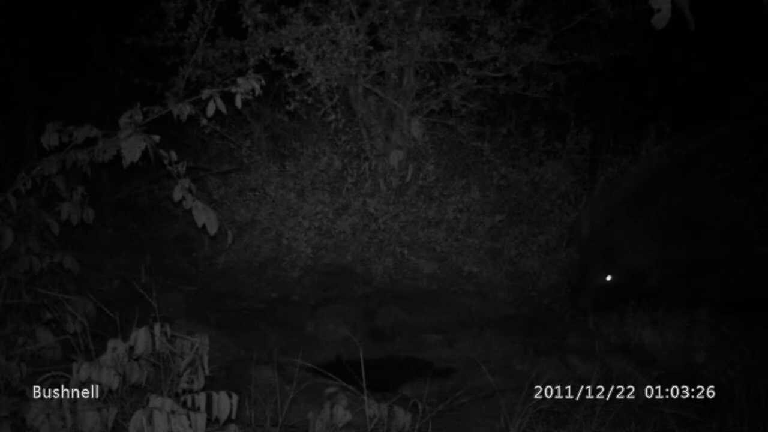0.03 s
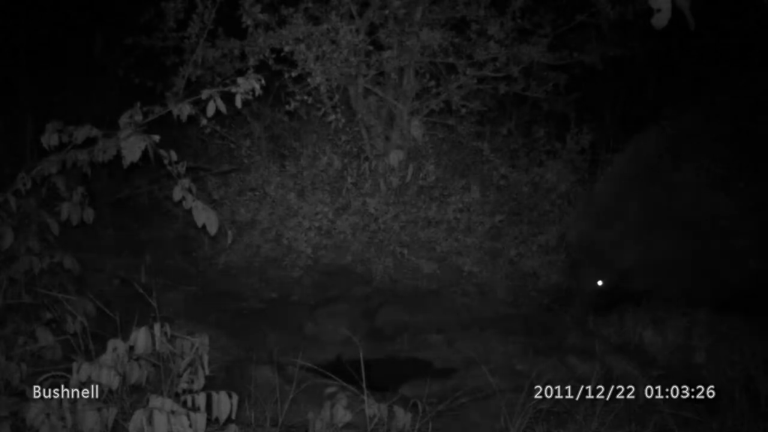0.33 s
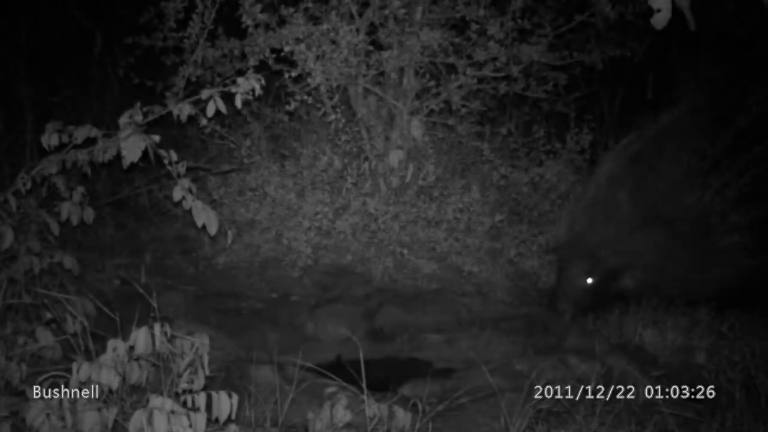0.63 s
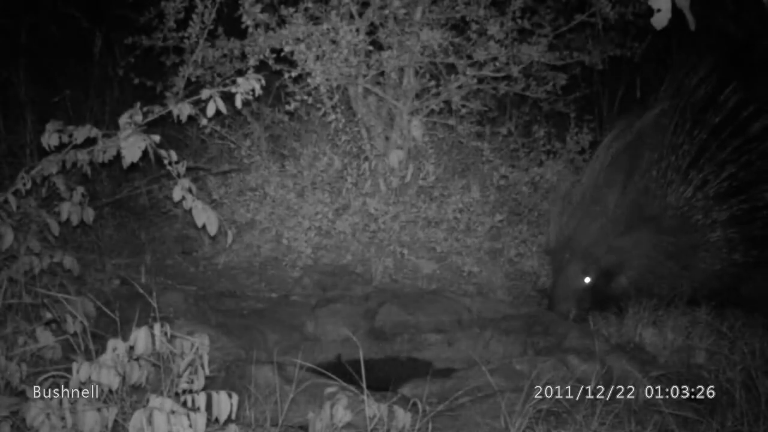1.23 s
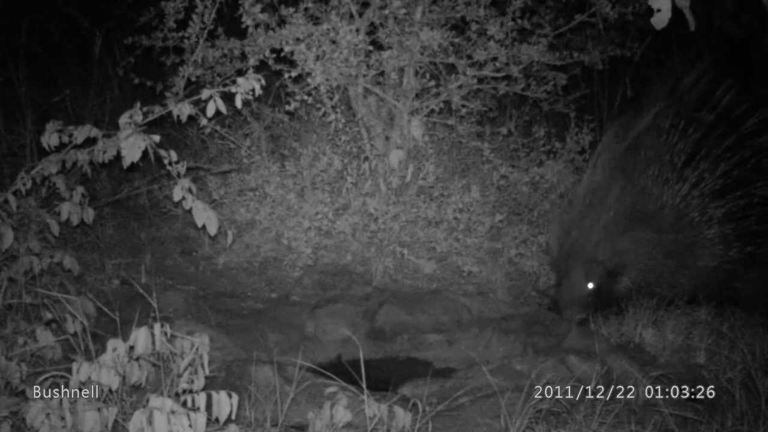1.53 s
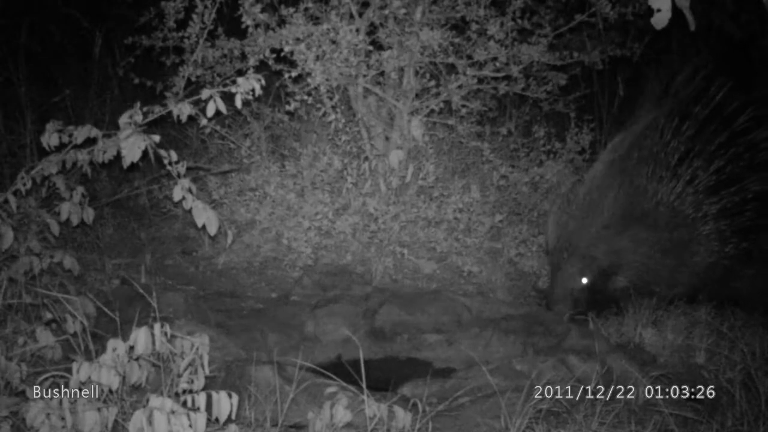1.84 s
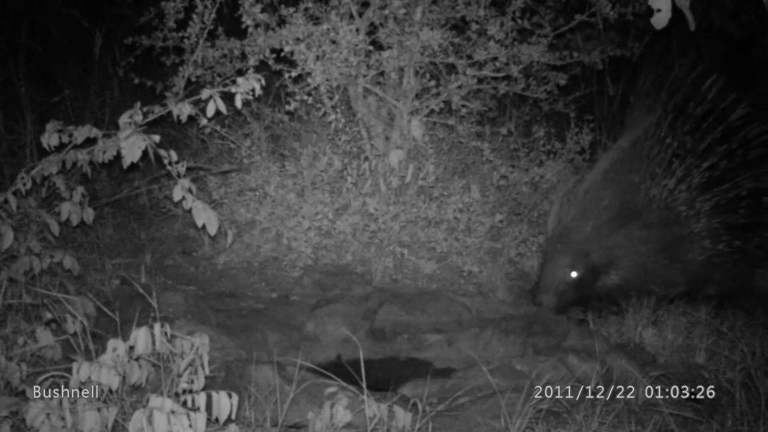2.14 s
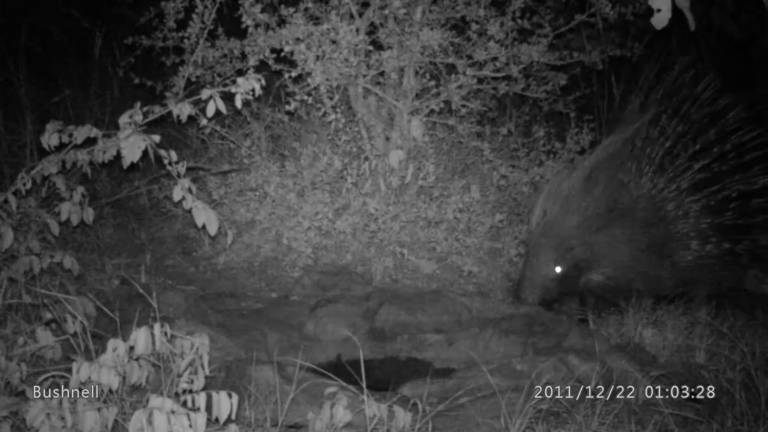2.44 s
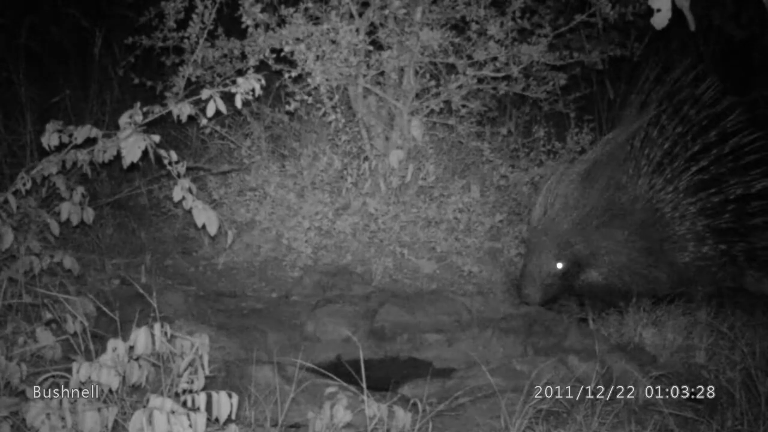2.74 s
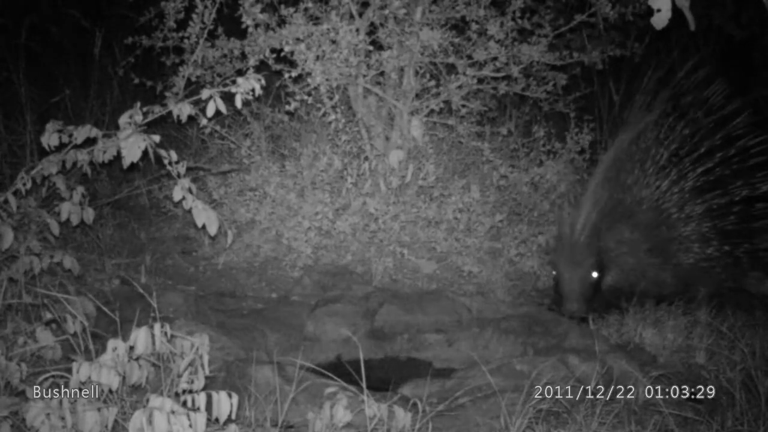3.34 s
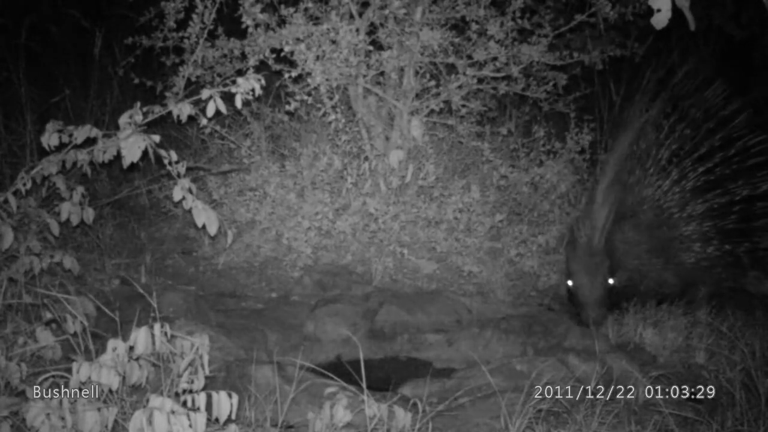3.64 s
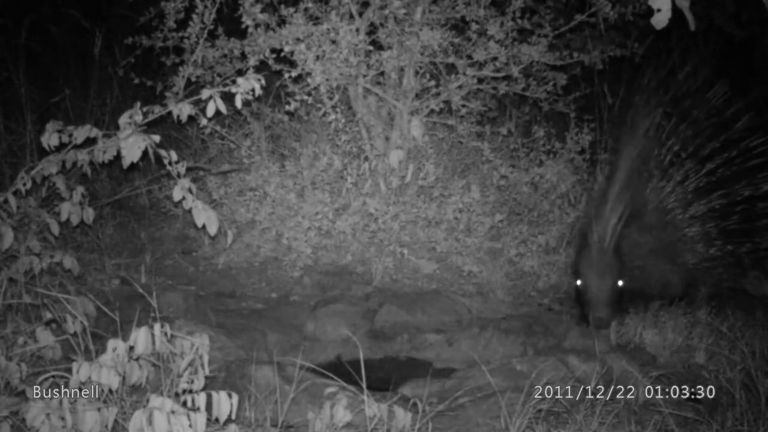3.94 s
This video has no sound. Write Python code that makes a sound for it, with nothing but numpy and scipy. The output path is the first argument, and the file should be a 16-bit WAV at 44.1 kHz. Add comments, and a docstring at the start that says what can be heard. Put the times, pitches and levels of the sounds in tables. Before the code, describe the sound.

Insects trill in short bursts at night over a camera's electrical buzz and hiss.

```python
"""Swelling insect trills at a waterhole at night, heard through a trail camera.
Right: the trills, runs of falling chirps scattered by bushes, over far crickets, twigs and mic hiss.
Left: the camera's electrical noise, a switch-on click, a rasp at each frame, longer bursts and a
warbling whine, over hum, dull bumps and scuffs. The low sample rate mirrors the sound into the treble."""
import sys
import numpy as np
from scipy import signal
from scipy.fft import rfft, irfft
from scipy.io import wavfile
from scipy.ndimage import uniform_filter1d

SR = 44100
rng = np.random.default_rng(int(sys.argv[2]) if len(sys.argv) > 2 else 0)


def persist_wave(psi):
    """Save psi, clipped to +-1, as 16-bit WAV."""
    counts = np.round(np.clip(psi, -1, 1) * 32767).astype(np.int16)
    wavfile.write(sys.argv[1], SR, np.atleast_2d(counts).T)


N = 176400

CHIRP_S, CHIRP_PERIOD_S, CHIRP_GROWTH_S, FIRST_CHIRP_SHARE = .0135, .0186, .145, .6
CHIRP_TAPER, CHIRP_ROUGHNESS, CHIRP_SCATTER_HZ = .65, .2, 30
PITCH_STEP_AGE_S, PITCH_STEP_S = .128, .024
# Trills: first_chirp_s, last_chirp_s, first_db, last_db, swell_s, first_hz, stepped_hz, full_sweep_hz,
# last_length_share
TRILLS = [(1.067, 1.2908, -64.5, -52.5, .145, 4496, 4673, 1090, .9),
          (1.311, 1.454, -63, -66, .14, 4890, 4950, 850, 1),
          (1.8354, 2.0444, -58, -45, .2, 4290, 4588, 890, .6),
          (2.964, 3.129, -69, -65.5, .17, 4940, 4920, 850, 1),
          (3.885, 3.9985, -59, -52, 0.087, 4295, 4600, 880, 1)]
def insect_trills(t):
    """Runs of falling chirps that grow longer and sweep wider; most swell and step up in pitch."""
    out = np.zeros(N)
    for first_s, last_s, first_db, last_db, swell_s, first_hz, stepped_hz, sweep_hz, last_share in TRILLS:
        count = int(round((last_s - first_s) / CHIRP_PERIOD_S)) + 1
        for k, age_s in enumerate(np.linspace(0, last_s - first_s, count)):
            size = FIRST_CHIRP_SHARE + (1 - FIRST_CHIRP_SHARE) * min(age_s / CHIRP_GROWTH_S, 1) ** 2
            length_s = CHIRP_S * size * (last_share if k == count - 1 else 1)
            on = around(first_s + age_s, length_s / 2)
            along = (t[on] - first_s - age_s) / length_s  # -0.5 to 0.5
            step = (1 + np.tanh((age_s - PITCH_STEP_AGE_S) / PITCH_STEP_S)) / 2
            centre_hz = first_hz + (stepped_hz - first_hz) * step + rng.normal(0, CHIRP_SCATTER_HZ)
            pitch_hz = centre_hz - sweep_hz * size ** 2 * along
            level_db = first_db + (last_db - first_db) * min(age_s / swell_s, 1)
            envelope = np.abs(np.cos(np.pi * along)) ** CHIRP_TAPER
            out[on] += envelope * tone(pitch_hz, [level_db])
    roughness = CHIRP_ROUGHNESS * (walk(700) + 1j * walk(650)) / np.sqrt(2)  # amplitude and phase
    return np.real(signal.hilbert(out) * (1 + roughness))


def bush_scatter(x, t, t60_s=.23, tail_db=-8):
    """Bushes scatter a sound into a short diffuse tail."""
    tail = rng.standard_normal(N) * np.exp(-np.log(1000) * t / t60_s)
    return x + amp(tail_db) * signal.fftconvolve(x, tail / np.linalg.norm(tail))[:N]


FRAME_HZ, FIRST_FRAME_S, RASP_S, SQUEAL_WOBBLE = 29.97, .379, .0068, .07
TICK_S, TICK_LEAD_S = .0011, .003
# Busy spell of the electronics: start_s, end_s
BUSY_S = (.680, 1.552)
# Long rasps: start_s, end_s
BURSTS = [(1.878, 2.085), (2.277, 2.318), (2.485, 2.518), (2.583, 2.602), (2.795, 2.818), (2.877, 2.897),
          (3.095, 3.118), (3.177, 3.202), (3.292, 3.318), (3.390, 3.410), (3.480, 3.494), (3.578, 3.603),
          (3.777, 3.800), (3.877, 3.902)]
# Rasp noise: freq_hz, density_db_per_hz
RASP_SPECTRUM = [(100, -116), (550, -114), (900, -105), (1400, -100), (1800, -103), (2300, -103),
                 (2850, -95.5), (3400, -101), (4200, -99), (5100, -95), (5800, -93)]
# Rasp squeal, harmonics 1-2: level_db
RASP_SQUEAL_DB = [-69, -65.5]
def frame_rasp(t, squeal_hz=1433, rasp_gain_db=-2, burst_gain_db=-3, rough_db=2.5):
    """Interference at each frame: ticks, then rasps and longer bursts; muted in the busy spell."""
    def from_frame_s(time_s):
        return np.abs(((time_s - FIRST_FRAME_S) * FRAME_HZ + .5) % 1 - .5) / FRAME_HZ

    running = t > FIRST_FRAME_S - .5 / FRAME_HZ
    ticks = gate(from_frame_s(t + TICK_LEAD_S), -1, TICK_S / 2)
    rasps = amp(rasp_gain_db) * gate(from_frame_s(t), -1, RASP_S / 2)
    bursts = sum(gate(t, *span) for span in BURSTS) * amp(burst_gain_db + rough_db * walk(500))
    envelope = np.maximum(np.where(running, rasps, ticks), bursts) * (1 - gate(t, *BUSY_S))
    squeal = tone(squeal_hz * (1 + SQUEAL_WOBBLE * walk(400)), RASP_SQUEAL_DB)
    return (hiss(RASP_SPECTRUM) + squeal) * envelope


WHINE_DRIFT, WHINE_SCATTER, WHINE_JITTER, WHINE_LIFT, WHINE_RISE = .025, .011, .016, .09, .22  # of pitch
RISE_AT_S, RISE_SCATTER_S, LIFT_EVERY_FRAMES, FIRST_LIFT_FRAME = .0268, .001, 8, 14
# Held note, harmonics 1-4: level_db
WHINE_DB = [-66.8, -66, -70.3, -80]
# Opening squeal, harmonics 1-2: level_db
BUSY_SQUEAL_DB = [-68.5, -66.5]
def busy_whine(t, whine_hz=906, squeal_hz=1362):
    """Busy electronics step through three notes a frame: a squeal, a held note, a short higher one."""
    frame, phase = np.divmod((t - FIRST_FRAME_S + RASP_S / 2) * FRAME_HZ, 1)
    index = (frame - frame[0]).astype(int)
    detune, lateness = rng.standard_normal((index[-1] + 1, 2))[index].T
    age_s = phase / FRAME_HZ
    lift = WHINE_LIFT * ((frame - FIRST_LIFT_FRAME) % LIFT_EVERY_FRAMES == 0)
    rise = WHINE_RISE * gate(age_s, RISE_AT_S + RISE_SCATTER_S * lateness, 1)
    bend = np.maximum(lift + WHINE_DRIFT * phase, rise)
    held = tone(whine_hz * (1 + bend + WHINE_SCATTER * detune + WHINE_JITTER * walk(300)), WHINE_DB)
    squeal = tone(squeal_hz * (1 + SQUEAL_WOBBLE * walk(400)), BUSY_SQUEAL_DB)
    squealing = gate(age_s, 0, RASP_S)
    return (held * (1 - squealing) + squeal * squealing) * gate(t, *BUSY_S)


# Busy hiss: freq_hz, density_db_per_hz
BUSY_SPECTRUM = [(100, -108), (500, -106), (1100, -102), (1600, -102), (2300, -100.5), (3600, -101.5),
                 (5000, -94.5), (5800, -92)]
def busy_hiss(t):
    """Steady electrical noise through the busy spell."""
    return hiss(BUSY_SPECTRUM) * gate(t, *BUSY_S)


# Sizzle: freq_hz, density_db_per_hz
SIZZLE_SPECTRUM = [(8000, -140), (9500, -111), (11000, -117), (12000, -126), (13000, -119), (14000, -114),
                   (15000, -116), (15600, -140)]
def busy_sizzle(t, flicker_db=4):
    """Flickering top treble in both channels through the busy spell."""
    channels = [hiss(SIZZLE_SPECTRUM) * amp(flicker_db * walk(59.96)) for _ in range(2)]
    return np.array(channels) * gate(t, *BUSY_S)


# Scuffs: centre_s, half_width_s, gain_db
SCUFFS = [(0.192, 0.03, 1), (0.269, 0.017, -1), (.491, 0.026, 0), (0.824, 0.034, -4), (1.045, 0.011, 0),
          (1.48, 0.032, -2.5), (1.815, 0.019, -0.5), (2.169, .025, 1.5), (2.237, 0.016, 4),
          (2.399, 0.027, -1.5), (2.472, .02, 3), (2.561, .025, -3), (2.778, .03, 0), (3.304, .018, 3)]
# Scuff noise: freq_hz, density_db_per_hz
SCUFF_SPECTRUM = [(20, -96), (55, -85), (120, -91.5), (200, -92), (320, -100), (500, -107), (900, -130)]
def scuffs(t):
    """Brief swells of dull noise."""
    return hiss(SCUFF_SPECTRUM) * swells(t, SCUFFS)


# Bumps: centre_s, level_db, pitch_hz
BUMPS = [(0.719, -62, 135), (0.904, -62.5, 122), (1.30, -62, 122), (1.412, -60, 122), (1.462, -62.5, 125)]
def bumps(t, half_width_s=.01):
    """Soft low bumps, a few cycles each."""
    out = np.zeros(N)
    for centre_s, level_db, pitch_hz in BUMPS:
        on = around(centre_s, np.pi * half_width_s)
        wave = np.sqrt(2) * np.sin(2 * np.pi * (pitch_hz * t[on] + rng.random()))
        out[on] += wave * swells(t[on], [(centre_s, half_width_s, level_db)])
    return out


def flutter(t, centre_s=1.18, half_width_s=.12, level_db=-63.5):
    """One deep swell of narrow-band noise."""
    return band(61.6, width_hz=29) * swells(t, [(centre_s, half_width_s, level_db)])


# Twigs and dry leaves: centre_s, half_width_s, level_db
TWIGS = [(0.469, 0.0022, -55), (0.608, 0.025, -66), (2.161, 0.096, -70.5)]
def twigs(t):
    """A small snap and rustles on the ground."""
    return band(3970, width_hz=650) * swells(t, TWIGS)


# Single cricket: time_s, level_db
CRICKET_LEVELS = [(.15, -70), (.21, -84), (.6, -78), (1.5, -81.5), (3.1, -78), (3.75, -79.5), (3.86, -77),
                  (3.95, -72.5)]
def far_cricket(t, pitch_hz=3113, waver_hz=17.86, flicker_db=3.5):
    """One far cricket holds a thin, wavering note."""
    note = tone(pitch_hz + waver_hz * walk(70), [0])
    return note * amp(np.interp(t, *np.array(CRICKET_LEVELS).T) + flicker_db * walk(30))


# Chorus: time_s, level_db
CHORUS_LEVELS = [(.1, -78), (1.0, -76), (1.55, -76), (1.8, -79), (2.4, -83), (2.7, -78), (3.25, -76),
                 (3.5, -70), (3.9, -78)]
def cricket_chorus(t, flicker_db=1):
    """Far crickets merge into a narrow band that swells and ebbs."""
    chorus = band(4800, width_hz=120)
    return chorus * amp(np.interp(t, *np.array(CHORUS_LEVELS).T) + flicker_db * walk(22))


# Faint hiss: freq_hz, density_db_per_hz
FLOOR_SPECTRUM = [(30, -112), (400, -115), (800, -111), (2000, -112), (4500, -112), (5800, -113)]
# Rumble: freq_hz, density_db_per_hz
RUMBLE_SPECTRUM = [(20, -94.5), (60, -92.5), (100, -102), (160, -112), (350, -120), (700, -135)]
def background_floor(t, whistle_hz=5184.5, whistle_db=-75.5, hum_hz=86.2, hum_db=-72.5):
    """Faint hiss, an interrupted whistle, a steady low hum and rumble."""
    running = t > FIRST_FRAME_S - 1 / FRAME_HZ
    whistling = running * np.clip(1.2 + 1.9 * walk(40), 0, 1)
    whistle = tone(np.full(N, whistle_hz), [whistle_db]) * whistling
    floor = hiss(FLOOR_SPECTRUM) * amp(np.where(running, 0, -2) + walk(62))
    hum = tone(np.full(N, hum_hz), [hum_db])
    rumble = hiss(RUMBLE_SPECTRUM) * amp(2 * walk(18))
    return floor + whistle + hum + rumble


# Microphone hiss: freq_hz, density_db_per_hz
MIC_SPECTRUM = [(30, -102), (150, -101), (500, -103), (1200, -105), (2200, -106), (3200, -105),
                (4800, -103.5), (5250, -108), (5800, -118)]
def mic_hiss():
    """Steady floor of the microphone channel."""
    return hiss(MIC_SPECTRUM)


def amp(db):
    """Decibels to gain."""
    return 10 ** (np.asarray(db) / 20)


def colour(x, points):
    """Filter by (freq_hz, gain_db) points."""
    hz, db = np.array(points, float).T
    bins_hz = np.maximum(np.fft.rfftfreq(2 * N, 1 / SR), 1)
    gain = amp(np.interp(np.log(bins_hz), np.log(hz), db))
    return irfft(rfft(x, 2 * N) * gain)[:N]


def hiss(spectrum):
    """Noise of the given density."""
    return colour(rng.standard_normal(N) * np.sqrt(SR / 2), spectrum)


def band(centre_hz, width_hz):
    """Noise in one resonance, rms 1."""
    bins_hz = np.fft.rfftfreq(N, 1 / SR)
    x = irfft(rfft(rng.standard_normal(N)) / (1 + ((bins_hz - centre_hz) / width_hz) ** 2), N)
    return x / x.std()


def tone(pitch_hz, harmonics_db):
    """Harmonics on a per-sample pitch."""
    phase = 2 * np.pi * np.cumsum(pitch_hz) / SR
    return np.sqrt(2) * sum(amp(db) * np.sin(k * phase) for k, db in enumerate(harmonics_db, 1))


def walk(rate_hz):
    """Smooth random wander, standard deviation 1."""
    hold = max(int(SR / rate_hz), 1)
    x = uniform_filter1d(np.repeat(rng.standard_normal(N // hold + 1), hold), hold)[:N]
    return x / x.std()


def gate(t, start_s, end_s):
    """On between two times, 1 ms edges."""
    return np.clip(np.minimum(t - start_s, end_s - t) * 1000 + .5, 0, 1)


def swells(t, rows):
    """Sum of Gaussian envelopes."""
    return sum(amp(db) * np.exp(-((t - centre_s) / half_s) ** 2) for centre_s, half_s, db in rows)


def around(centre_s, reach_s):
    """Sample indices near a moment."""
    return np.arange(max(int((centre_s - reach_s) * SR) + 1, 0), min(int((centre_s + reach_s) * SR), N))


def scene():
    """Night on the right; electronics over a low background on the left, leaking into the right."""
    t = np.arange(N) / SR
    rasp, whine, busy = frame_rasp(t), busy_whine(t), busy_hiss(t)
    trills = bush_scatter(insect_trills(t), t)
    night = trills + far_cricket(t) + cricket_chorus(t) + twigs(t) + mic_hiss()
    electronics = rasp + whine + busy
    background = background_floor(t) + scuffs(t) + bumps(t) + flutter(t)
    leak = amp(-20) * busy + amp(-8.5) * whine + amp(-25.5) * rasp
    return np.array([electronics + background, night + leak])


CAMERA_RATE_HZ, LOWPASS_HZ, SWITCH_ON_S, LEFT_OFFSET = 12000, 15500, .10595, .075
# Filter before sampling: freq_hz, gain_db
INPUT_FILTER = [(5000, -0.5), (5450, -0.5), (5800, -7), (6000, -16.5), (6300, -33)]
# Filter after sampling: freq_hz, gain_db
OUTPUT_FILTER = [(4500, 0.5), (6500, -3), (7500, -3.5), (9000, -7), (10000, -17), (11000, -25),
                 (11500, -44), (12500, -42), (14000, -30), (15000, -27.5)]
def record(dry):
    """Coarse sampling mirrors the sound about 6 kHz; sizzle on top; a DC step clicks at switch-on."""
    t = np.arange(N) / SR
    mirror = 1 + 2 * np.cos(2 * np.pi * CAMERA_RATE_HZ * t)
    sampled = np.array([colour(colour(x, INPUT_FILTER) * mirror, OUTPUT_FILTER) for x in dry])
    powered = uniform_filter1d((t > SWITCH_ON_S) * 1., size=2)
    wet = powered * (sampled + busy_sizzle(t) + np.array([[LEFT_OFFSET], [0]]))
    return signal.sosfilt(signal.ellip(8, .01, 70, LOWPASS_HZ, fs=SR, output="sos"), wet)


dry = scene()
out = record(dry)
persist_wave(out)
```